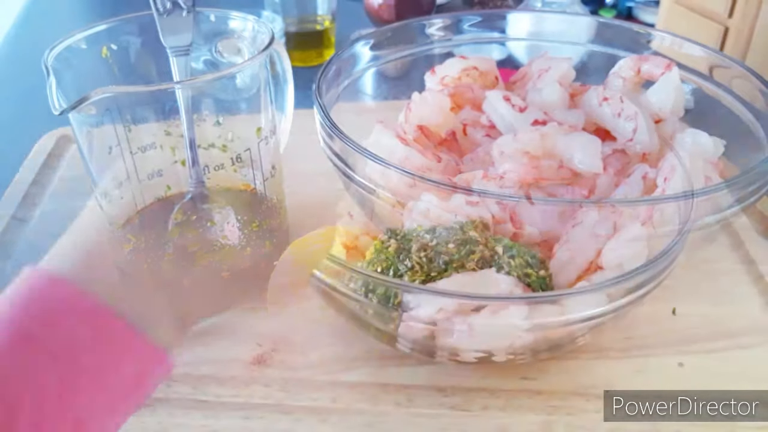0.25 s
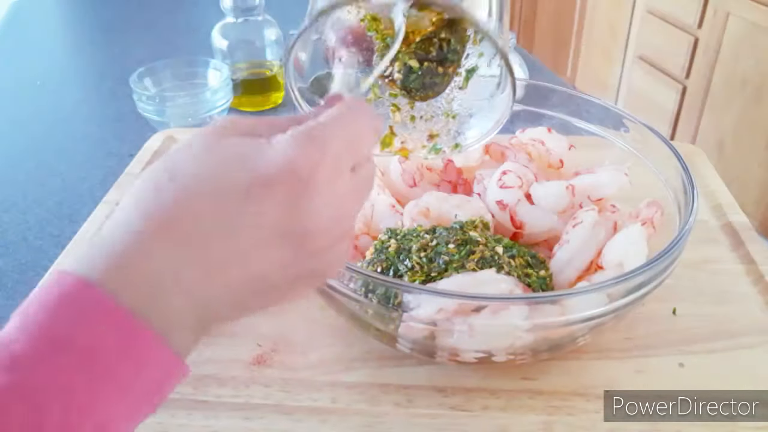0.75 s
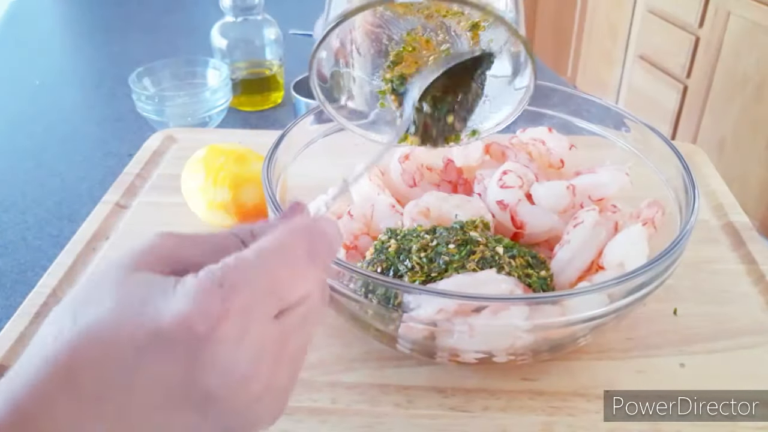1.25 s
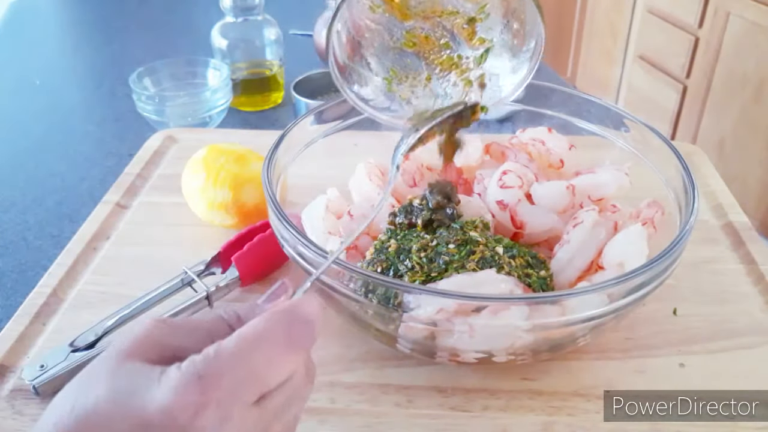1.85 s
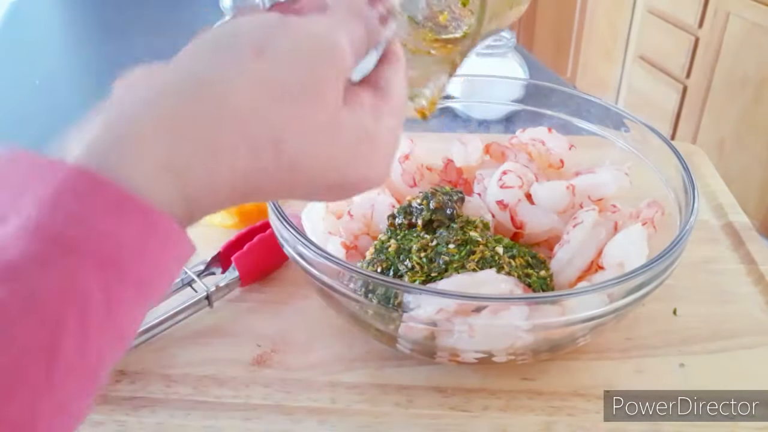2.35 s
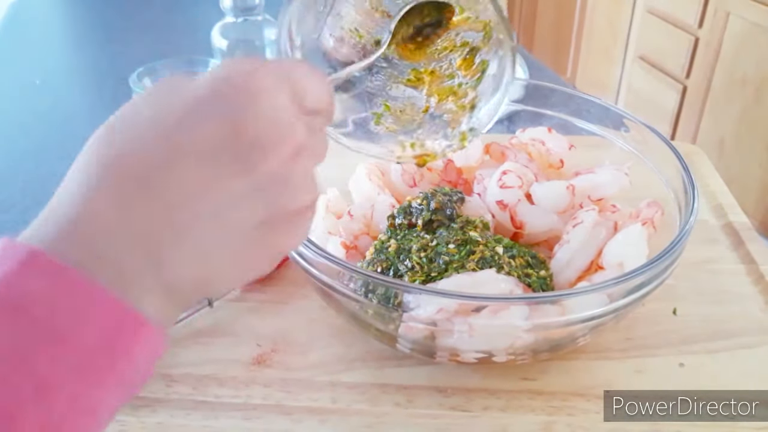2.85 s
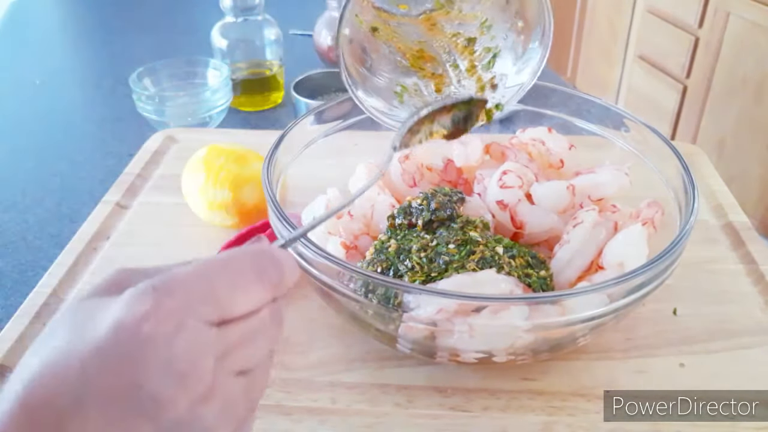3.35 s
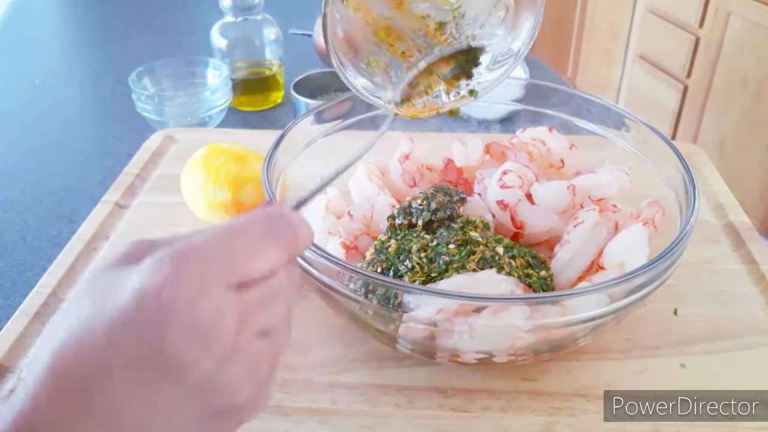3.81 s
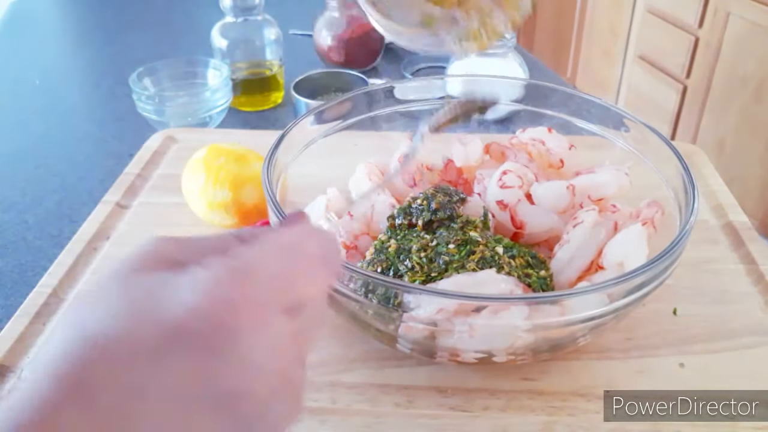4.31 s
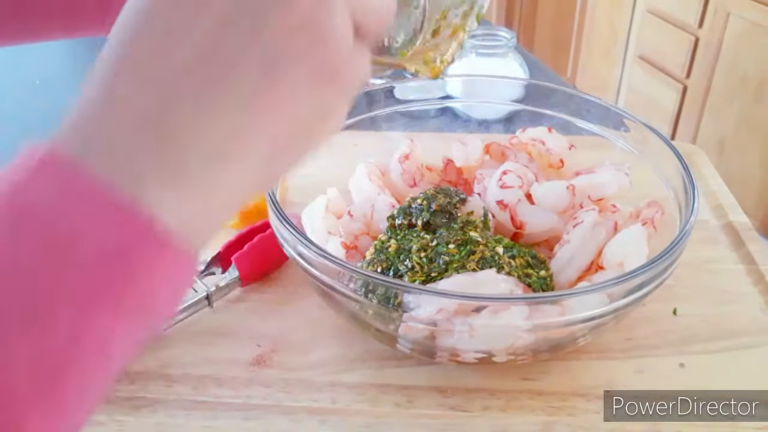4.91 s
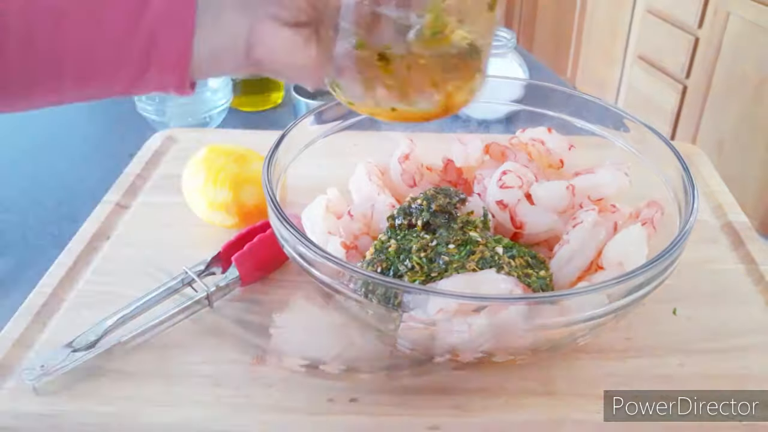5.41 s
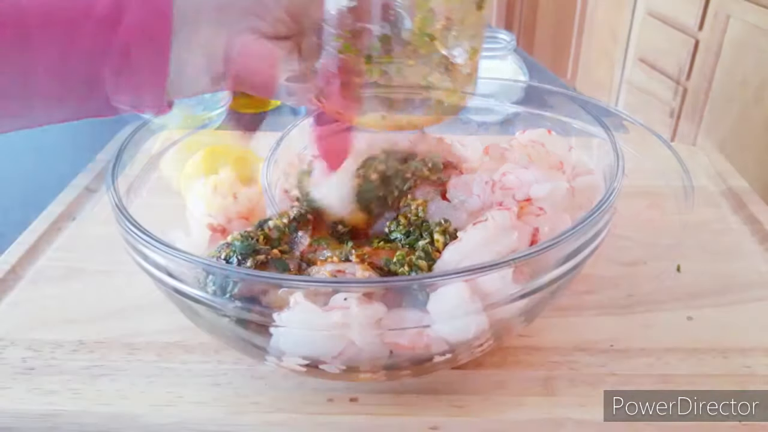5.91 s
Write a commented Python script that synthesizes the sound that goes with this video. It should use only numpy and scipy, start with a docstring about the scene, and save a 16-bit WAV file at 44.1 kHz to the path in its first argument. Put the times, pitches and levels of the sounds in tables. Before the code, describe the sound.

A metal spoon knocks unevenly inside a hand-held glass jug, making short, bright clinks with faint scrapes between them. Late on it taps the rim of a glass bowl once with a clear ring, then clatters in the jug again. Tongs finish with a few soft, wet ticks in the food. The sound is close and in stereo, in a small kitchen with a low appliance hum.

```python
"""A metal spoon knocks and scrapes inside a hand-held glass jug, close to a phone in a small kitchen.
Each blow cracks, rings the glass and the spoon, and thumps the air in the jug. Once the spoon taps
the rim of the bowl below; later tongs click in the food. The room answers over a low appliance hum.
The phone's two microphones hear it in stereo; near the start and the end all falls briefly silent."""
import sys
import numpy as np
from scipy import signal
from scipy.fft import rfft, irfft
from scipy.io import wavfile

SR = 44100
rng = np.random.default_rng(int(sys.argv[2]) if len(sys.argv) > 2 else 0)


def bounce(signal):
    """Save signal as a 16-bit WAV file at the path given by the first command-line argument."""
    frames = np.transpose(np.atleast_2d(signal))
    limited = np.clip(frames, -1, 1)
    pcm = np.round(limited * 32767).astype(np.int16)
    wavfile.write(sys.argv[1], SR, pcm)


N = 271991

MIC_LAG_S = 2 / SR  # travel time between the two microphones
ALIKE_HZ = 500  # below this both microphones hear much the same
# modes of the jug's glass wall: f/Hz
WALL_HZ = [1308, 3112, 3975, 4120, 4225, 4300, 4345, 5660, 6092, 6690, 6735]
# the same modes, row by row: level/dB, free t60/s
WALL_MODES = [(-18, 0.49), (3.5, 0.23), (-11, 0.31), (-14.5, 0.14), (-10.5, 0.49), (-8, 0.33), (-5, 0.16),
              (-5, 0.35), (-6.5, 0.45), (2, 0.11), (-1, 0.3)]
# two short silences: from t/s, to t/s
GAPS = [(0.223, .329), (5.759, 5.829)]


def undb(db):
    """Decibels to amplitude."""
    return 10 ** (np.asarray(db) / 20)


def unit(x):
    """Scale to rms 1."""
    return x / np.sqrt(np.mean(x ** 2))


def along(table, hz):
    """Read (f/Hz, value) points on a log axis."""
    points_hz, values = np.transpose(table)
    return np.interp(np.log(hz + 1), np.log(points_hz + 1), values)


def colour(x, table):
    """Filter by (f/Hz, level/dB) points."""
    n = x.shape[-1]
    return irfft(rfft(x) * undb(along(table, np.arange(n // 2 + 1) * SR / n)), n)


def fade(t, t60):
    """Decay by 60 dB in t60 seconds."""
    return np.exp(-np.log(1000) * t / np.maximum(t60, 1e-3))


def place(out, start_s, sound, db, pan_db):
    """Add a sound, its end faded out; pan is left minus right."""
    i, n = int(start_s * SR), sound.shape[1]
    end = np.clip((n - np.arange(n)) / (.1 * SR), 0, 1)
    out[:, i:i + n] += end * sound * undb(db + pan_db * np.array([[.5], [-.5]]))


def ring(hz, db, t60, t, scatter_db, spread):
    """Decaying modes of randomly scattered level, each with its own phase at the two microphones."""
    hz, db, t60 = (np.asarray(column)[:, None] for column in (hz, db, t60))
    level_draw, phase_draw = rng.standard_normal((2, len(hz), 1))
    skew = np.pi * hz * MIC_LAG_S + spread * np.minimum(hz / ALIKE_HZ, 1) ** 2 * phase_draw
    at_mics = undb(db + scatter_db * level_draw) * np.exp(1j * skew * np.array([1, -1]))
    modes = np.exp(2j * np.pi * hz * t) * fade(t, t60)
    return (at_mics.T @ modes).imag * np.minimum(t / .0006, 1)  # the contact lasts a moment


def crack(t, tail_t60, spectrum):
    """A noise burst for the many short modes of a contact, which lie differently every time."""
    shared, left, right = rng.standard_normal((3, len(t)))
    apart = colour(np.array([left, right]), [(150, -20), (700, 0)])  # the bass stays alike
    noise = np.array([shared, np.roll(shared, int(MIC_LAG_S * SR))]) + .9 * apart
    burst = noise * (fade(t, .002) + .5 * fade(t, .032) + .32 * fade(t, tail_t60))
    lumps_db = 4 * np.interp(np.linspace(0, 90, len(t) // 2 + 1), np.arange(91), rng.standard_normal(91))
    return colour(irfft(rfft(burst) * undb(lumps_db), len(t)), spectrum)


def hum():
    """Appliance rumble and thin hiss, with unsteady motor tones between the two silences."""
    # course of the hum: t/s, level/dB
    levels = [(0.0, -56), (0.29, -57), (0.58, -54), (1.23, -63), (1.89, -58.5), (4.7, -56.5), (5.83, -59.5),
              (6.16, -56.5)]
    # its spectrum between the silences: f/Hz, level/dB
    middle_colour = [(15, -72.5), (25, -30), (43, -23.5), (202, -7), (615, -7), (899, -15.5), (1060, -17),
                     (1870, -30.5), (2890, -35.5), (3590, -26.5), (4970, -37.5), (7270, -32),
                     (11200, -31.5), (15100, -45), (16400, -59.5)]
    # its spectrum before and after them: f/Hz, level/dB
    ends_colour = [(15, -49), (25, -55), (108, -4), (238, -7), (456, -7.5), (495, -18.5), (582, -14.5),
                   (807, -27), (1630, -38), (2320, -34), (3590, -39), (5850, -31), (9540, -42),
                   (14700, -36), (16400, -43)]
    # motor tones as narrow peaks in the noise: f/Hz, width/Hz, weight/dB
    motor = [(185, 5.9, -9), (317, 13, -13), (374, 9.1, -9.5), (486, 8.3, -11), (620, 18, -8.5)]
    # likeness of the hum at the two microphones: f/Hz, correlation
    likeness = [(60, .8), (130, .94), (290, .93), (640, .6), (1410, 0.76), (3100, 0.0)]
    t, hz = np.arange(N) / SR, np.arange(N // 2 + 1) * SR / N
    alike = np.clip(along(likeness, hz), 0, 1)
    mid, side = rfft(rng.standard_normal((2, N)))
    noise = np.array([np.sqrt(1 + alike) * mid + sign * np.sqrt(1 - alike) * side for sign in (1, -1)])
    tones = sum(undb(2 * db) * 600 / width / (1 + (2 * (hz - f) / width) ** 2) for f, width, db in motor)
    middle = unit(irfft(noise * undb(along(middle_colour, hz)) * np.sqrt(1 + tones), N))
    ends = undb(1) * unit(irfft(noise * undb(along(ends_colour, hz)), N))
    between = (t > GAPS[0][0]) & (t < GAPS[1][1])
    return undb(np.interp(t, *np.transpose(levels))) * np.where(between, middle, ends)


def spoon_scrapes():
    """The spoon's edge drags over the wall: uneven grains of friction, partly ringing the damped glass."""
    # strokes of the spoon: t/s, hold/s, level/dB
    strokes = [(0.31, 0.033, -65), (1.745, 0.026, -75), (2.246, 0.32, -67), (2.86, 0.0057, -57.5),
               (3.096, 0.14, -77.5), (3.34, 0.15, -69.5), (4.5, 0.056, -76.5), (5.557, 0.019, -57.5),
               (5.585, .02, -43)]
    # spectrum of the friction: f/Hz, level/dB
    friction_colour = [(350, -30.5), (600, -35.5), (801, -37.5), (944, 5), (1730, -20), (3040, -6),
                       (7210, -6), (8990, -9), (13000, -15.5), (16000, -78.5)]
    grains_per_s, attack_s, release_t60 = 3000, .011, .085
    grains = rng.standard_normal(N) * undb(2 * rng.exponential(size=N))
    grains *= rng.random(N) < grains_per_s / SR
    wall_db, wall_t60 = np.transpose(WALL_MODES)
    wall = ring(WALL_HZ, wall_db, .3 * wall_t60, np.arange(SR // 10) / SR, scatter_db=2, spread=.4)
    ringing = signal.fftconvolve(wall, grains[None])[:, :N]
    t, envelope = np.arange(N) / SR, 0
    for start_s, hold_s, db in strokes:
        swell = np.clip((t - start_s) / attack_s, 0, 1)
        release = fade(np.maximum(t - start_s - attack_s - hold_s, 0), release_t60)
        envelope += undb(db) * swell * release
    return (unit(colour(grains, friction_colour)) + .5 * unit(ringing)) * envelope


def chatter(t, decay_s, rebounds_per_s=400):
    """One blow's energy, shared between the first contact and sparse, dying rebounds."""
    contacts = .9 * rng.standard_normal(len(t)) * (rng.random(len(t)) < rebounds_per_s / SR)
    contacts *= np.exp(-t / decay_s)
    contacts[0] = 1
    return contacts / np.sqrt(np.sum(contacts ** 2))


def spoon_blows():
    """The spoon strikes the jug: glass, air and metal ring, drawn out as it chatters on the wall."""
    # blows: t/s, level/dB, then relative level/dB of air thump, first ring, upper wall modes,
    # second ring, spoon with crack; chatter decay/s, freedom to ring (scales decay times)
    blows = [(0.426, -13.5, -13, -36, -6.5, -36, 2.5, 0.0034, 0.32),
             (0.453, -20, -25.5, -7, -5.5, -7.5, 1, 0.01, 0.26),
             (0.62, -48, 4, -16, -14, -29.5, -9.5, 0.013, 0.98),
             (0.651, -21.5, -14.5, -32.5, -27, -23, 2, 0.0028, 0.22),
             (0.6733, -27, -31, -34, -34, -37, -5, 0.0053, 0.3),
             (0.724, -38.5, -40, -3, -25.5, -5.5, 10.5, 0.003, 0.14),
             (0.805, -15.5, -11, -25, 5, -10, 3, 0.025, 0.25),
             (0.944, -4.5, -50, -34.5, -16, -8.5, -9.5, 0.0029, 0.14),
             (1.1415, -59.5, 2, -14.5, -16.5, -14, 6, 0.0077, .4),
             (1.1771, -44, -13, -29, -58, -19.5, 14, 0.0041, 0.12),
             (1.4253, -17, -29.5, -10.5, -12.5, -18, 3, 0.0076, 0.4),
             (1.9582, -16, -25, -9.5, -32.5, -20.5, 9.5, 0.015, 0.21),
             (2.1147, -21, -20.5, -9.5, -10.5, -10.5, -5.5, .0036, 0.77),
             (2.3978, -12.5, -10, -27, -9, -14, 2, 0.0011, .52),
             (2.4694, -27.5, -22.5, -16, -12.5, -20, -9.5, 0.0067, 0.61),
             (2.5043, -16, -49.5, -23, -20.5, -19.5, 0, 0.0041, 0.077),
             (2.6964, -8, -21, -12.5, -8.5, -11, 0.5, 0.0036, 0.42),
             (2.9147, -51.5, -23.5, -20.5, -13.5, -20, 5, 0.022, 0.89),
             (2.978, -49.5, -17, -25.5, -12.5, -14.5, 1, .0085, 0.62),
             (3.2302, -54.5, -7.5, -20, -16.5, -20.5, 0.5, 0.013, .86),
             (3.347, -54.5, -5, -7.5, -57.5, -36.5, 12, 0.0072, 0.23),
             (3.3687, -44.5, -17.5, -16.5, -53, -43, 15, .012, 0.15),
             (3.4096, -39, -17.5, -14.5, -37.5, -31.5, 9.5, 0.0064, 0.14),
             (3.5009, -24.5, -12, -5.5, -8.5, -5.5, -3.5, 0.0072, 0.54),
             (3.7434, -13.5, -32, -14, -22, -12, 4, 0.0077, 0.6),
             (3.8212, -23, -19, -22.5, -37, -27, 14, 0.0019, 0.48),
             (4.039, -44.5, -26, -26, -24.5, -14.5, 0, 0.012, .5),
             (4.1624, -34.5, 2.5, -22, -23, -17, 2, 0.015, 0.51),
             (4.2288, -54.5, -1, -1, -35, -33.5, 5, .007, .25),
             (4.2725, -33, -12.5, -8, -26, -7, 6, 0.014, 0.13),
             (5.0772, -16.5, -32.5, -18.5, -24, -19.5, -8, 0.013, 0.47),
             (5.1912, -7, -16.5, -22.5, -4, -15, -7, 0.019, 0.48),
             (5.2103, -17.5, -22, -15, -7, -4.5, 11.5, 0.01, 0.95),
             (5.2897, -30.5, -42, -3.5, 11.5, 11, 1.5, 0.0047, 0.28),
             (5.584, -24.5, -27.5, -20, -12, -13.5, -12, .011, 0.29)]
    # the first ring shifts with grip and sauce, and all wall modes with it: t/s, f/Hz
    first_ring = [(1.0, 3075), (1.43, 3020), (2.1, 3112), (4.2, 3112), (4.27, 2930), (5.07, 3112)]
    # zone of each wall mode: 1 first ring, 2 upper, 3 middle, 4 second ring
    wall_zones = [1, 1, 2, 2, 2, 2, 2, 3, 3, 4, 4]
    # highest wall modes, soon damped by hand and sauce: f/Hz, level/dB
    top_modes = [(8450, -2), (9270, 0.5), (9960, -19.5), (10940, -9.5), (11640, -3.5), (12100, -11.5)]
    # air in the jug and the hand behind it: f/Hz, level/dB, free t60/s
    air_modes = [(876, 3.5, 0.038), (953.7, 5.3, .04), (312, -13, 0.09)]
    # the spoon's bowl and handle, two low modes first: f/Hz, level/dB, free t60/s
    spoon_modes = [(2689, 0.5, 0.29), (3620, 1.5, 0.49), (4276, -30.5, .1), (5477, -27.5, 0.12),
                   (6492, -15, 0.16), (7480, -21, 0.041)]
    wall_db, wall_t60 = np.transpose(WALL_MODES)
    top_hz, top_db = np.transpose(top_modes)
    top_t60 = np.full(len(top_hz), .09)
    air_hz, air_db, air_t60 = np.transpose(air_modes)
    metal_hz, metal_db, metal_t60 = np.transpose(spoon_modes)
    out, t = np.zeros((2, N + SR)), np.arange(int(.32 * SR)) / SR
    for start_s, db, thump_db, first_db, upper_db, second_db, spoon_db, chatter_s, free in blows:
        free = np.clip(free, .1, 1.5)
        middle_db, high_db = -11 + .52 * upper_db, -3.5 + .42 * upper_db
        zone_db = np.take([thump_db, first_db, upper_db, middle_db, second_db], wall_zones)
        shift = np.interp(start_s, *np.transpose(first_ring)) / WALL_HZ[1]
        wall = ring(shift * np.array(WALL_HZ), wall_db + zone_db, free * wall_t60, t, 2, .5)
        air = ring(air_hz, air_db + thump_db, np.sqrt(free) * air_t60, t, 1.5, .8)
        top = ring(shift * top_hz, top_db + high_db, free * top_t60, t, 3, 1.2)
        # the low spoon modes ignore spoon_db and are louder when the glass is damped
        low_db = np.where(np.arange(len(metal_hz)) < 2, -21.5 - 11 * free - spoon_db, 0)
        metal = ring(metal_hz, metal_db + low_db, free * metal_t60, t, 3, 1)
        crack_colour = [(150, thump_db - 22.5),  # dull knock of the held jug
                        (900, thump_db - 2), (1500, -30), (2300, -21), (3100, first_db / 2 - 6.5),
                        (4250, upper_db / 2 - 5.5), (5700, middle_db + 1), (6700, second_db / 2 - 1.5),
                        (9000, high_db + 2), (12000, high_db - 1), (13500, high_db - 10),
                        (16000, high_db - 25.5)]
        spoon = undb(spoon_db) * (metal + undb(6.5) * crack(t, .26 * free, crack_colour))
        contacts = chatter(t, chatter_s)[None, :len(t) // 3]
        blow = signal.fftconvolve(wall + air + top + spoon, contacts)[:, :len(t)]
        place(out, start_s, blow, db, pan_db=-1.5)
    return out[:, :N]


def bowl_tap():
    """One clean contact of the spoon on the rim: the bowl rings freely."""
    # spoon on the rim: t/s, level/dB, relative crack level/dB, pan/dB
    taps = [(4.6621, -6.5, -3.5, -4)]
    # modes of the bowl: f/Hz
    bowl_hz = [310, 823, 1840, 3262, 4990, 6980, 9203, 10500, 10680, 11660]
    # the same modes, row by row: level/dB, t60/s
    bowl_modes = [(-19.5, 0.052), (-18, 0.083), (-38, 0.147), (-2, 0.22), (-27.5, 0.081), (1.5, 0.096),
                  (-27, 0.1316), (-39.5, .15), (-27, .2), (-18, 0.24)]
    crack_colour = [(50, -47), (150, -23.5), (500, -2), (2000, -18.5), (6000, -14), (10500, .5),
                    (13500, -32)]
    out, t = np.zeros((2, N + SR)), np.arange(SR // 2) / SR
    for start_s, db, crack_db, pan_db in taps:
        bowl = ring(bowl_hz, *np.transpose(bowl_modes), t, scatter_db=.5, spread=.1)
        bowl *= 1 - .9 * fade(t, .025)  # the ring builds up as the spoon leaves
        place(out, start_s, bowl + undb(crack_db) * crack(t, .18, crack_colour), db, pan_db)
    return out[:, :N]


def tong_clicks():
    """Tongs turn the food: small wet ticks without a ring."""
    # clicks: t/s, level/dB, centre f/Hz, pan/dB
    clicks = [(5.8331, -46, 6340, -4.5), (6.056, -47.5, 11600, 10), (6.098, -47, 7300, -1),
              (6.1305, -36.5, 4650, 2.5), (6.1492, -31.5, 6000, 0)]
    out, t = np.zeros((2, N + SR)), np.arange(SR // 5) / SR
    for start_s, db, hz, pan_db in clicks:
        spectrum = [(500, -40), (1500, -16), (.78 * hz, -8), (hz, 0), (1.29 * hz, -8), (17000, -16)]
        place(out, start_s, crack(t, .15, spectrum), db, pan_db)
    return out[:, :N]


def kitchen_echo(direct, level_db=-7):
    """The small room's echoes, shorter in the treble and there unrelated at the two microphones."""
    # decay of the kitchen: f/Hz, t60/s
    decay = [(300, 0.36), (1500, 0.33), (5000, 0.27), (12000, 0.28)]
    t, tail = np.arange(int(.6 * SR)) / SR, 0
    for hz in 150 * 2 ** np.arange(0, 7, .5):
        band = signal.butter(2, [hz / 2 ** .25, hz * 2 ** .25], "band", fs=SR, output="sos")
        mid, side = rng.standard_normal((2, len(t)))
        side = side * np.array([[1], [-1]]) * min(hz / ALIKE_HZ, 1)
        tail += signal.sosfilt(band, mid + side) * fade(t, along(decay, hz))
    tail *= np.clip((t - .003) / .019, 0, 1)  # echoes build up after the direct sound
    tail /= np.sqrt((tail ** 2).sum(1, keepdims=True))
    return undb(level_db) * signal.fftconvolve(tail, direct.mean(0, keepdims=True))[:, :N]


def scene():
    """Spoon, jug, bowl and tongs at close range, with the kitchen and its hum behind them."""
    low_cut = signal.butter(2, 70, "high", fs=SR, output="sos")  # small objects radiate no deep bass
    direct = signal.sosfilt(low_cut, spoon_blows() + bowl_tap() + spoon_scrapes() + tong_clicks())
    return direct + kitchen_echo(direct) + hum()


def record(dry):
    """The loudest peaks are softly rounded and the top is cut; twice the sound drops out briefly."""
    ceiling, top_hz = .95, 16400
    t = np.arange(N) / SR
    sound = dry / (1 + (np.abs(dry) / ceiling) ** 4) ** .25
    for start_s, end_s in GAPS:
        sound *= np.clip(np.maximum(start_s - t, t - end_s) / .0005, 0, 1)
    return signal.sosfilt(signal.ellip(10, .2, 80, top_hz, fs=SR, output="sos"), sound)


dry = scene()
out = record(dry)
bounce(out)
```